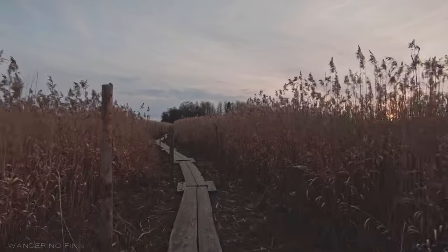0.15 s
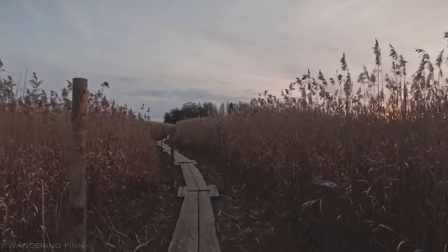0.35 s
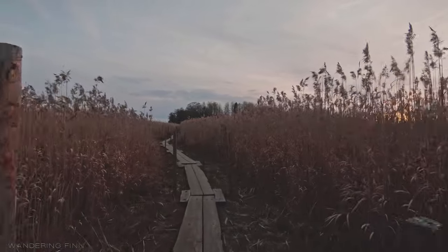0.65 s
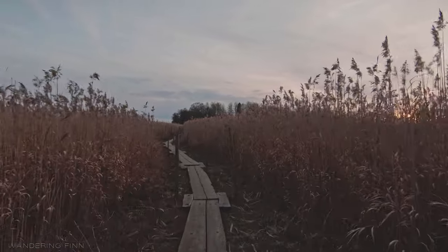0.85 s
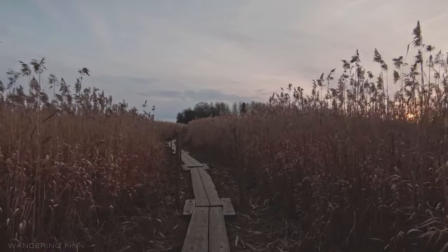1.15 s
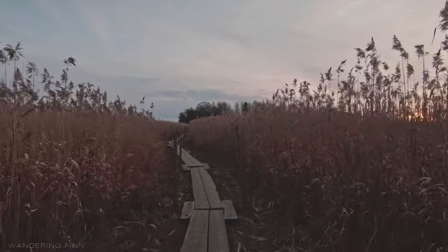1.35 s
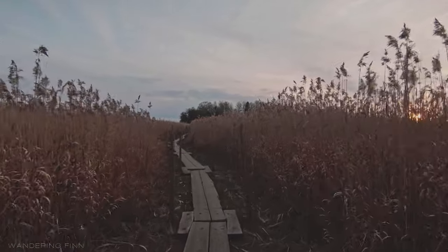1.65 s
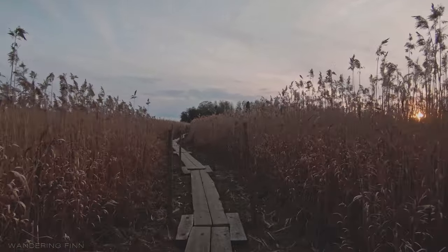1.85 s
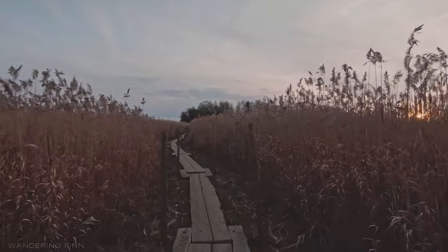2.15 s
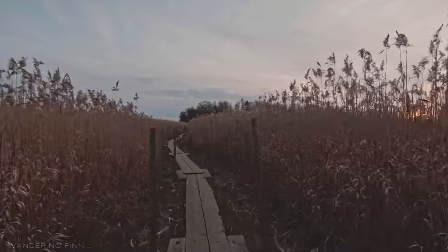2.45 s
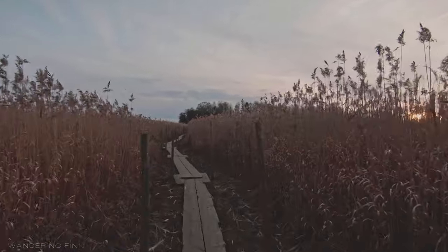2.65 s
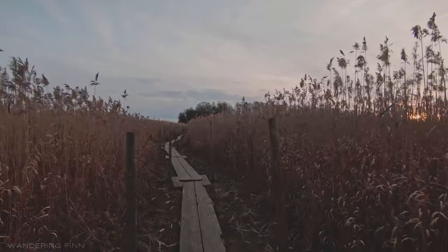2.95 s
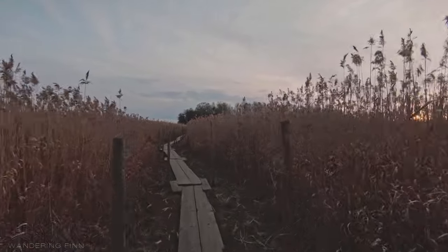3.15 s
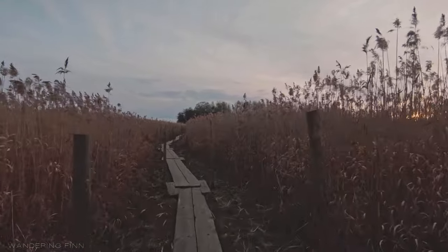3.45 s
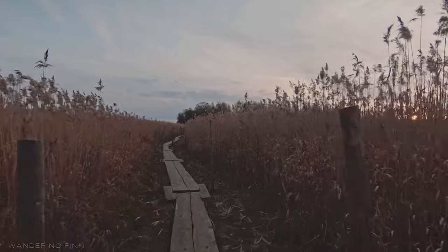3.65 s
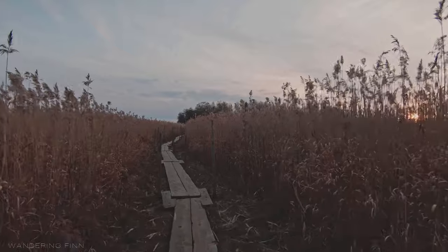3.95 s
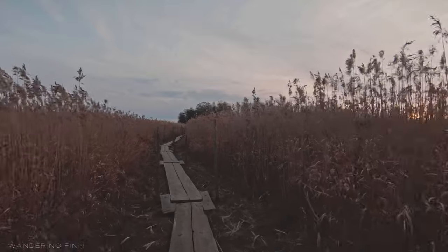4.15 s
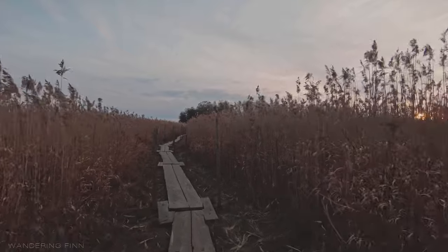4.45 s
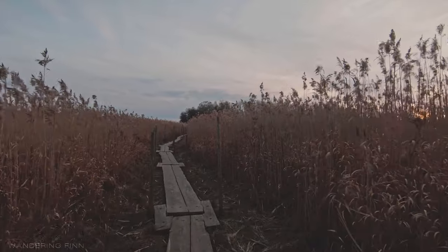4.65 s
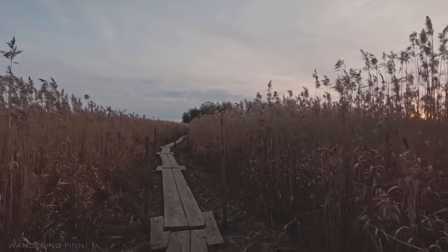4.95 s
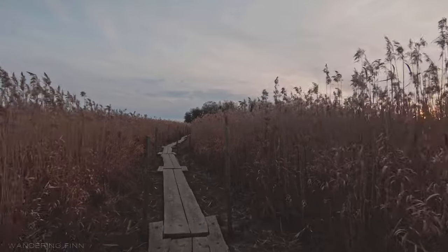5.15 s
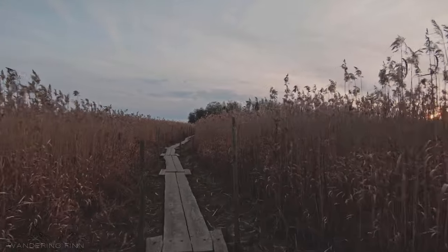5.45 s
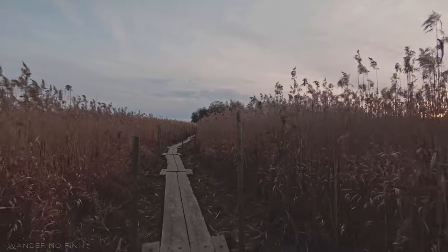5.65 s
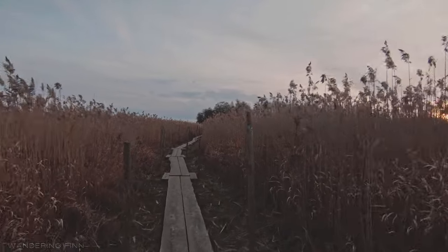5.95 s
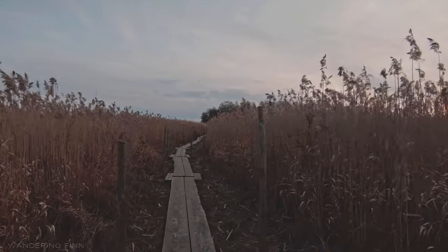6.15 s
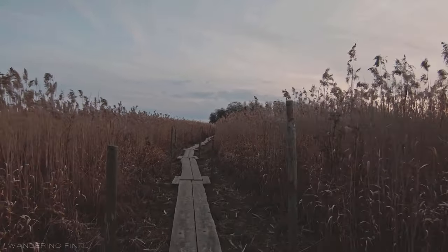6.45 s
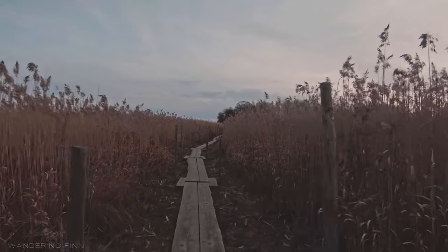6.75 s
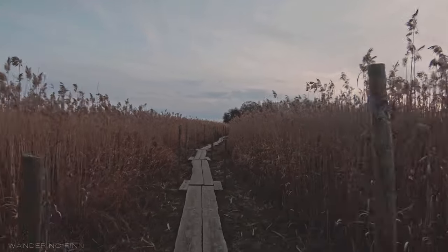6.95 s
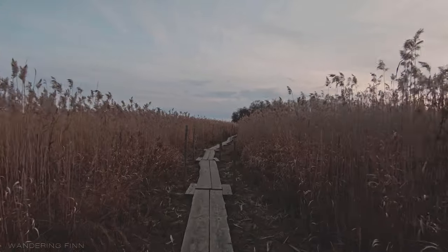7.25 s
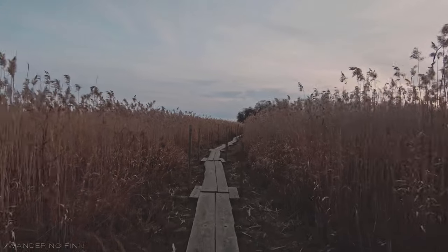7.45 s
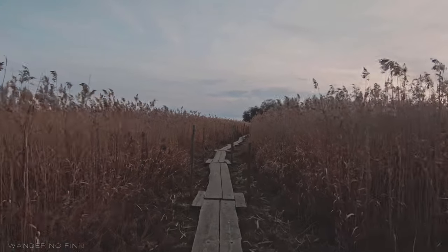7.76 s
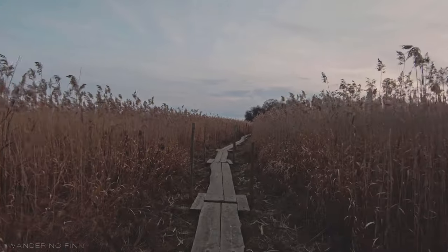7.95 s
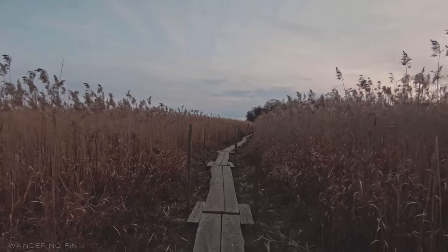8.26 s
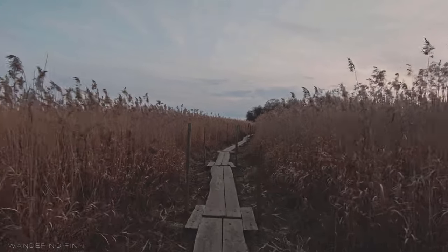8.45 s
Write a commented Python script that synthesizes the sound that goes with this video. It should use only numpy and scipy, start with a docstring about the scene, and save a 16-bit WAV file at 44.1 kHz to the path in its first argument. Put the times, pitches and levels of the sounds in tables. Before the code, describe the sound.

Hollow, even footsteps on wooden planks continue from start to finish, heard from the walker's position outdoors. Heels knock on the boards, soles crunch small bits of grit, and a shoe occasionally grazes the wood. Faint cloth swishes and very short board creaks come in among the steps. Underneath are a quiet hush of reeds and a low wind rumble on the microphone that grows a little toward the end.

```python
"""Boardwalk through the reeds

Someone walks steadily along hollow planks. Each heel knocks a board into ringing, the sole rolls down
and crunches grit, and clothing swishes between steps. Coarse grains crack, loose boards creak, and the
swinging shoe sometimes grazes the wood. Light wind rumbles on the microphone over a faint hush of reeds."""
import sys
import numpy as np
from scipy import signal
from scipy.fft import rfft, irfft, next_fast_len
from scipy.io import wavfile
from scipy.ndimage import uniform_filter1d

SR = 44100
rng = np.random.default_rng(int(sys.argv[2]) if len(sys.argv) > 2 else 0)


def unload_wav(signal):
    """Save mono or channel-first audio to the path in sys.argv[1] as 16-bit WAV at rate SR, clipped to [-1, 1]."""
    wavfile.write(
        sys.argv[1],
        SR,
        np.round(np.clip(np.atleast_2d(signal).T, -1, 1) * 32767).astype(np.int16),
    )


N = 380141
TIME = np.arange(N) / SR

# Colour of wind on the microphone: (frequency [Hz], level [dB])
WIND_COLOUR = [(1, -26), (4, 0), (7, 3.5), (12, -7.5), (20, -21.5), (30, -26), (45, -31.5), (65, -48),
               (100, -63), (200, -70), (500, -82)]
# Rise and fall of the wind: (time [s], relative level [dB])
GUSTS = [(0.0, -48.5), (0.7, -49), (1.0, -49.5), (1.25, -46.5), (2.35, -47), (2.85, -45.5), (3.1, -48.5),
         (3.5, -48.5), (3.85, -48.0), (4.6, -46), (4.95, -48), (5.3, -45), (6.2, -46.5), (7.4, -42.5),
         (8.1, -47), (8.3, -38.5), (8.6, -48.5)]
# Colour of the reed bed's hush: (frequency [Hz], level [dB])
REED_COLOUR = [(60, 10.5), (160, 0), (320, 4.5), (600, -4), (1300, -13.5), (3000, -22), (5500, -21),
               (8200, -21), (10000, -24), (16000, -25)]
# Footsteps: (heel time [s], knock [dB], pitch [ratio], hardness [dB/octave], lasting mode [Hz],
# lasting mode [dB], sole delay [s], sole knock [dB], sole lasting mode [dB], roll length [s],
# scuff [dB], following swish [dB])
STEPS = [(.072, -33.5, 1, -4, 348, -39, .02, -55, -52, 0.11, -62.5, -54),
         (.6444, -31, 1.04, -2, 282, -47, .0176, -30.5, -41.5, .09, -59.5, -61),
         (1.214, -30, 1.06, -2, 289, -30, .02, -47, -55, 0.088, -61.5, -60),
         (1.718, -39.5, 1.12, 2, 422, -41, .0336, -30, -34.5, 0.086, -63.5, -59),
         (2.293, -31.5, 1.015, -1.5, 325, -42, .02, -51, -50, 0.11, -64, -59.5),
         (2.8615, -32.5, 0.97, -2.5, 233, -35, .02, -62, -54, 0.057, -55.5, -62.5),
         (3.3943, -32, 1.02, -1.5, 267.6, -41, .0357, -56, -32.5, 0.054, -61.5, -54),
         (3.983, -30.5, 0.92, -3, 428.4, -33.5, .007, -39, -30, .075, -59.5, -68),
         (4.566, -29, 0.96, 1, 289, -28, .009, -28.5, -35, 0.025, -66, -78),
         (5.0553, -31.5, 0.94, -.5, 232, -33.5, .02, -58, -53, 0.062, -63, -65.5),
         (5.594, -31, 1.007, -2, 360, -64, .02, -55, -61, 0.069, -60.5, -53.5),
         (6.168, -30.5, 1.05, -2, 236, -35, .02, -53, -55, .058, -56, -63),
         (6.7092, -32.5, 0.95, -1.5, 236, -38.5, .02, -55, -53, 0.056, -61, -55),
         (7.2715, -32.5, 0.93, -0.5, 195.5, -36.5, .048, -49, -51, 0.064, -56.5, -70),
         (7.8193, -27.5, 0.95, -1.5, 393, -45, .0157, -38, -32, 0.058, -64.5, -54.5),
         (8.371, -28.5, 1, -3.5, 254, -39, .023, -58, -36.5, 0.058, -59, -70)]
# Ring of a plank: (frequency [Hz], level [dB], t60 [s])
PLANK_MODES = [(186.6, -10.5, 0.07), (237.7, -7, 0.047), (279.6, -8.5, 0.13), (380, -3.5, 0.066),
               (456.5, -4.5, 0.048), (562, -24.5, 0.022), (707, -17.5, 0.02), (834, -1.5, 0.016),
               (1230, -12, 0.0069), (1617, -14, 0.028), (1943, -20.5, 0.045), (2540, -12, 0.0063)]
# Dull thuds of the swinging toe on a plank: (time [s], level [dB])
TOE_BUMPS = [(3.946, -43.5), (4.478, -39)]
# Ring of grit between sole and wood: (frequency [Hz], base width [Hz], level [dB])
GRIT_MODES = [(480, 70, -6), (745, 70, -5), (1170, 170, -5.5), (1560, 110, -3), (1785, 90, 0),
              (2020, 110, 1), (2310, 190, 0), (2680, 330, -4), (3370, 190, -2), (4000, 300, -11),
              (5100, 600, -11), (5700, 300, -11), (7050, 380, -4), (7800, 600, -6), (8900, 600, -13),
              (10500, 800, -14), (12300, 600, -14), (13800, 1600, -22)]
# The swinging shoe grazes the boards: (time [s], length [s], level [dB])
SHOE_DRAGS = [(1.632, 0.064, -64.5), (1.854, 0.024, -61), (3.967, .03, -54), (4.257, .035, -59.5),
              (4.384, 0.13, -66), (4.503, 0.096, -60.5), (5.24, .11, -68.5), (7.22, 0.032, -62.5),
              (7.379, 0.1, -59.5), (7.75, 0.067, -57), (7.918, 0.088, -62.5), (8.525, 0.045, -61.5)]
# Coarse grit breaking: (time [s], relative level [dB], brightness [dB/octave], creak length [s])
GRIT_CRACKS = [(.1478, -41.5, 3, 0.0018), (0.1675, -40, -3, 0), (.659, -24, -3, 0.024),
               (.7106, -38, -7, 0.0033), (0.7129, -10.5, -2, 0), (1.2767, -32.5, -3, .012),
               (1.7186, -36.5, -7, 0.0032), (2.327, -42.5, -3, 0.042), (2.35, -40, 0, 0),
               (2.3763, -39, -4, 0.029), (2.4284, -39, -2.5, 0.039), (2.8648, -36.5, -3, 0.0083),
               (2.872, -36.5, -2, 0), (2.912, -35.5, -2.5, 0), (3.981, -25.5, -5, 0.073),
               (4.56, -24.5, -4.5, 0.0068), (4.5959, -40, -4.5, 0.0048), (5.1164, -31.5, -1.5, .018),
               (6.7405, -35, -3, 0), (6.751, -27.5, -5, 0.023), (7.2956, -35.5, 1, 0.0024),
               (7.316, -37, -8, 0.019), (7.4501, -33.5, -2, 0.0041), (7.5038, -29, -4.5, 0.017),
               (7.7574, -38.5, 1, 0)]
# Colour of rubbing cloth: (frequency [Hz], level [dB])
CLOTH_COLOUR = [(200, -1), (650, 7.5), (1300, -1.5), (2100, -6), (3000, -2), (4000, -4), (5200, -17),
                (7500, -24), (9500, -18), (16000, -41)]
# Body of a creaking board: (frequency [Hz], width [Hz], level [dB])
CREAK_MODES = [(425, 34, 19.5), (776, 19, 8.5), (1115, 250, 11), (1466, 160, 10), (1980, 50, -29),
               (2680, 750, -5), (4370, 310, -5)]


def from_db(db):
    """Decibels to gain."""
    return 10 ** (np.asarray(db) / 20)


def rms_one(x):
    """Scale to unit power."""
    return x / np.sqrt(np.mean(x ** 2) + 1e-20)


def add(track, s, sound):
    """Mix a sound into the track from time s on."""
    start = max(int(s * SR), 0)
    track[start:start + len(sound)] += sound[:max(N - start, 0)]


def noise(colour):
    """Unit-power noise with the given spectrum."""
    hz, db = np.transpose(colour)
    size = next_fast_len(N)
    bins = np.maximum(np.fft.rfftfreq(size, 1 / SR), 1)
    gain = from_db(np.interp(np.log(bins), np.log(hz), db))
    return rms_one(irfft(rfft(rng.standard_normal(size)) * gain, size)[:N])


def drift(knots_per_s):
    """Random wander with a spread of about one."""
    knots = rng.standard_normal(2000)
    return np.interp(TIME * knots_per_s, np.arange(len(knots)), knots)


def resonate(x, hz, width):
    """A two-pole resonance with unity gain at its peak."""
    radius = np.exp(-np.pi * width / SR)
    feedback = [1, -2 * radius * np.cos(2 * np.pi * hz / SR), radius ** 2]
    return signal.lfilter(np.array([1, 0, -1]) * (1 - radius ** 2) / 2, feedback, x)


def band(x, low_hz, high_hz):
    """A gentle band-pass."""
    return signal.sosfilt(signal.butter(2, [low_hz, high_hz], "band", fs=SR, output="sos"), x)


def wind(level_db=-2, step_gust_db=2.5, step_lag_s=0.02):
    """Eddies rumble on the microphone, swelling with gusts and as each step pushes it through the air."""
    eddies = noise(WIND_COLOUR)
    rumble_rms = np.std(band(eddies, 20, 90))   # the audible lows set the level
    stride = np.interp(TIME - step_lag_s, [s for s, *_ in STEPS], np.arange(len(STEPS)))
    airflow_db = np.interp(TIME, *np.transpose(GUSTS)) + step_gust_db * np.cos(2 * np.pi * stride)
    fades = signal.windows.tukey(N, .01)
    return fades * eddies / rumble_rms * from_db(airflow_db + level_db)


def reeds(hush_db=-57, waver_db=0.9, rustle_db=-72, plumes_db=-76, breeze_s=6.55, breeze_width_s=1.8):
    """A wavering hush, faint patches of dry rustle, and one breeze hissing through the seed plumes."""
    patches = from_db(3 * drift(knots_per_s=30))
    rustle = rms_one(band(rng.standard_normal(N), 730, 3690)) * from_db(rustle_db) * patches
    breeze = np.exp(-((TIME - breeze_s) / breeze_width_s) ** 2)
    plumes = rms_one(band(rng.standard_normal(N), 5300, 13000)) * from_db(plumes_db) * breeze
    hush = noise(REED_COLOUR) * from_db(hush_db + waver_db * drift(knots_per_s=5.5))
    return hush + rustle + plumes


def blows(sole_pitch=0.94, sole_hardness=-2.2, loaded_ratio=.82, toe_hardness=-10, toe_hz=249,
          jolt_above_db=-18, jolt_db=-29, jolt_hardness=7.5, jolt_hz=241):
    """Every hit on the planks, laid out like the first six columns of STEPS."""
    for s, db, pitch, hardness, mode_hz, mode_db, sole_delay, sole_db, sole_mode_db, *_ in STEPS:
        yield s, db, pitch, hardness, mode_hz, mode_db
        # The sole lands on a board that already bears weight, so the lasting mode rings lower.
        yield s + sole_delay, sole_db, sole_pitch, sole_hardness, mode_hz * loaded_ratio, sole_mode_db
    for s, db in TOE_BUMPS:
        yield s, db, 1, toe_hardness, toe_hz, db
    for s, db, *_ in GRIT_CRACKS:
        if db > jolt_above_db:   # a very large grain jolts the plank as it breaks
            yield s, db + jolt_db, 1, jolt_hardness, jolt_hz, db + jolt_db


def plank_slap(t, pitch, start_hz=1100, end_hz=250, fall_s=0.002075, t60=0.064, level_db=-1):
    """High bending waves run faster, so a blow opens with a quick downward chirp."""
    hz = pitch * (end_hz + (start_hz - end_hz) * np.exp(-t / fall_s))
    attack = 1 - np.exp(-2 * t / fall_s)
    return np.sin(2 * np.pi * np.cumsum(hz) / SR) * attack * from_db(level_db - 60 * t / t60)


def plank_knocks(scatter_db=0.6, detune=0.026, contact_s=0.0002, lasting_t60=0.14, swell_s=0.006,
                 deck_db=-14, deck_t60=0.2):
    """Each blow rings the plank; one mode swells and lasts, and the deck around shudders."""
    out, t = np.zeros(N), TIME[:SR // 3]
    hz, mode_db, t60 = np.transpose(PLANK_MODES)[:, :, None]
    signs = (-1) ** np.arange(len(PLANK_MODES))[:, None]   # alternating modes: the lows build up later
    attack = 1 - np.exp(-t / contact_s)
    swell = 1 - np.exp(-t / swell_s)
    deck_envelope = swell * from_db(deck_db - 60 * t / deck_t60)
    for s, db, pitch, hardness, lasting_hz, lasting_db in blows():
        strength, shift = rng.standard_normal((2, len(PLANK_MODES), 1))
        struck_db = mode_db + hardness * np.log2(hz / 350) + scatter_db * strength
        modes = signs * np.sin(2 * np.pi * hz * pitch * (1 + detune * shift) * t)
        ring = np.sum(modes * from_db(struck_db - 60 * t / t60), axis=0)
        knock = ring * attack + plank_slap(t, pitch)
        lasting = np.cos(2 * np.pi * lasting_hz * t) * swell * from_db(-60 * t / lasting_t60)
        deck = rms_one(band(rng.standard_normal(len(t)), 122, 425)) * deck_envelope
        add(out, s, from_db(db) * (knock + deck) + from_db(lasting_db) * lasting)
    return out


def grit_ring(force, tilt, damping, variety):
    """Harder grains ring brighter, and every spot underfoot has its own slight colour."""
    shift, strength = variety * rng.standard_normal((2, len(GRIT_MODES)))
    ring = np.zeros(len(force))
    for k, (hz, width, db) in enumerate(GRIT_MODES):
        gain = (-1) ** k * from_db(db + tilt * np.log2(hz / 3000) + 20 * strength[k])
        ring += gain * resonate(force, hz * np.exp(shift[k]), width * damping)
    return ring


def scuffs(roll_delay_s=.026, grains_per_s=700, spread_db=5, rub=0.21, fizz_db=-13.4):
    """A rolling or dragging sole crushes tiny grains: a muffled crunch and a bright fizz."""
    out = np.zeros(N)
    rolls = [(s + roll_delay_s, length, db) for s, *_, length, db, swish_db in STEPS]
    for s, length, db in rolls + SHOE_DRAGS:
        chance, size = rng.random((2, SR // 4))
        friction = rng.standard_normal(SR // 4)
        grain_gain = from_db(spread_db * np.minimum(-np.log(1 - size), 4))
        grains = (chance < grains_per_s / SR) * grain_gain * np.sign(friction)
        force = grains + rub * friction
        crunch = band(grit_ring(force, tilt=-3.2, damping=2, variety=.035), 300, 4000)
        fizz = from_db(fizz_db) * band(np.roll(force, SR // 300), 2200, 12000)   # dust scatters just after
        pressure = signal.windows.tukey(int(length * SR), .19)
        add(out, s, from_db(db) * pressure * rms_one((crunch + fizz)[:len(pressure)]))
    return out


def small_grains(delay_s=0.05, spread_s=.008, relative_db=-45, scatter_db=2.5, tilt=-3):
    """One small grain gives way as the weight reaches the ball of each foot."""
    chance = rng.standard_normal((len(STEPS), 2))
    return [(s + delay_s + spread_s * late, relative_db + scatter_db * size, tilt)
            for (s, *_), (late, size) in zip(STEPS, chance)]


def grit_cracks(crumble_db=-19, crumble_t60=0.022, dust_db=-40, dust_t60=0.075,
                tail_db=-31, tail_t60=0.081, snap_db=-12, boost_db=11):
    """A grain snaps, crumbles for a few milliseconds and leaves a short ring in the wood."""
    out, t = np.zeros(N), TIME[:SR // 8]
    loudest_db = max(db for s, db, *_ in GRIT_CRACKS)
    crumbling = from_db(crumble_db - 60 * t / crumble_t60) + from_db(dust_db - 60 * t / dust_t60)
    for s, db, tilt, *_ in GRIT_CRACKS + small_grains():
        crumbs, tail = rng.standard_normal((2, len(t)))
        force = crumbs * crumbling + band(tail, 230, 1470) * from_db(tail_db - 60 * t / tail_t60)
        force[0] += 1   # the snap itself
        smallness = min((loudest_db - db) / 20, 1)   # small grains stay buried, damped by the sole
        ring = grit_ring(force, tilt, damping=1 + smallness, variety=.05 * smallness)
        ring += from_db(snap_db + 2 * tilt) * band(force, 4100, 17200)
        add(out, s, from_db(db + boost_db) * ring / np.linalg.norm(ring))
    return out


def clothing(pass_share=.606, swish_s=.019, squeak_hz=3900, squeak_db=-4.5, overtone_db=-11,
             waver=0.0513, brisk_db=-53, octaves_per_db=0.2):
    """Cloth brushes cloth as the legs pass; the ribs of the weave give a wavering squeak."""
    out, t, cloth = np.zeros(N), TIME[:SR // 5], noise(CLOTH_COLOUR)
    touch = np.exp(-(2 * (t - t.mean()) / swish_s) ** 2)
    for k, ((heel_s, *_, db), (next_heel_s, *_)) in enumerate(zip(STEPS, STEPS[1:])):
        pass_s = heel_s + pass_share * (next_heel_s - heel_s)
        hz = squeak_hz * 2 ** (octaves_per_db * (db - brisk_db))   # a brisker swish squeaks higher
        speed = 1 + waver * rms_one(uniform_filter1d(rng.standard_normal(len(t)), size=24))
        phase = 2 * np.pi * np.cumsum(hz * speed) / SR
        squeak = rms_one(np.sin(phase) + from_db(overtone_db) * np.sin(2 * phase))
        rub = cloth[k * len(t):(k + 1) * len(t)]
        add(out, pass_s - t.mean(), from_db(db) * touch * (rub + from_db(squeak_db) * squeak))
    return out


def board_creaks(slips_per_s=330, unevenness=0.22, rub=0.049, fade_db=7, shortest_s=.005,
                 creak_db=-47.5, strong_crack_db=-23.5, follow_share=0.42):
    """Set off by a crack and growing with it, a loose board sticks and slips on its bearer."""
    out = np.zeros(N)
    for s, crack_db, _, length in GRIT_CRACKS:
        if length <= shortest_s:
            continue
        slip_times = np.cumsum(np.exp(unevenness * rng.standard_normal(40))) / slips_per_s
        force = rub * rng.standard_normal(SR // 4)
        force[np.minimum(slip_times * SR, len(force) - 1).astype(int)] += 1
        wood = sum(from_db(mode_db) * resonate(force, hz, width) for hz, width, mode_db in CREAK_MODES)
        size = int(length * SR)
        load = signal.windows.tukey(size, .15) * from_db(fade_db * np.linspace(.5, -.5, size))
        db = creak_db + follow_share * (crack_db - strong_crack_db)
        add(out, s, from_db(db) * load * rms_one(wood[:size]))
    return out


def scene():
    """Footsteps and clothing over a bed of reeds and wind, in mono."""
    footsteps = plank_knocks() + grit_cracks() + board_creaks() + scuffs()
    return (footsteps + clothing() + reeds() + wind())[None]


def record(dry, cutoff_hz=15750):
    """A steep low-pass trims the very top."""
    return signal.sosfilt(signal.ellip(10, .2, 70, cutoff_hz, fs=SR, output="sos"), dry)


dry = scene()
out = record(dry)
unload_wav(out)
```